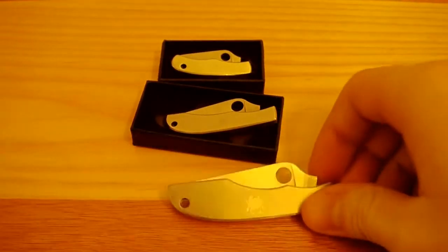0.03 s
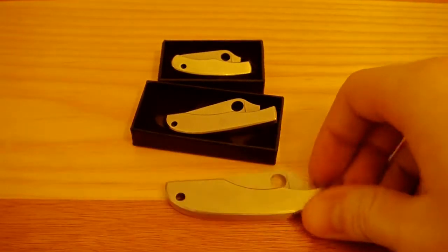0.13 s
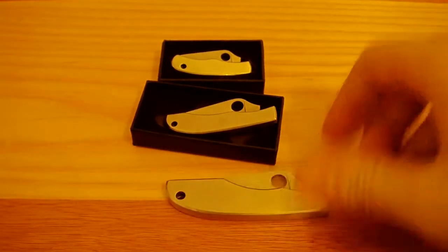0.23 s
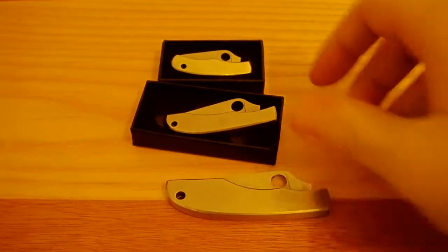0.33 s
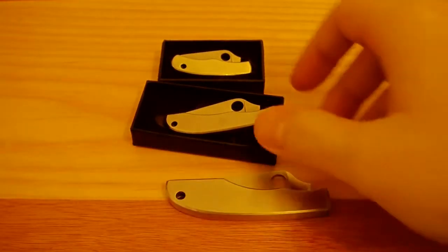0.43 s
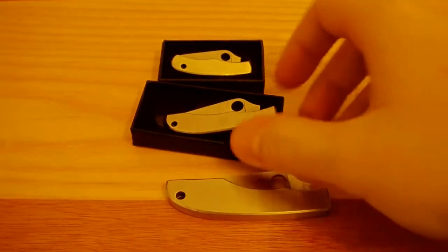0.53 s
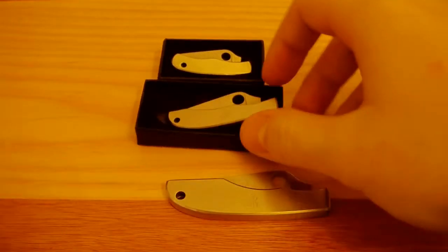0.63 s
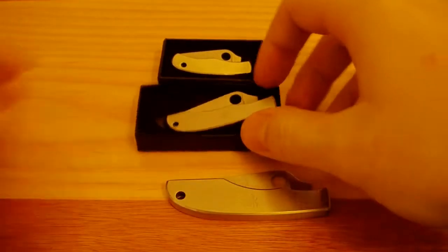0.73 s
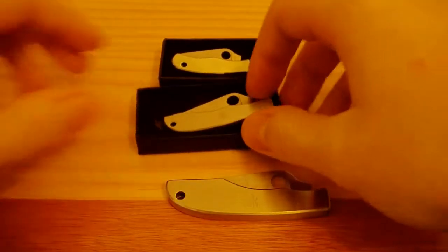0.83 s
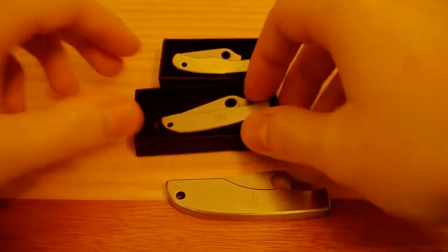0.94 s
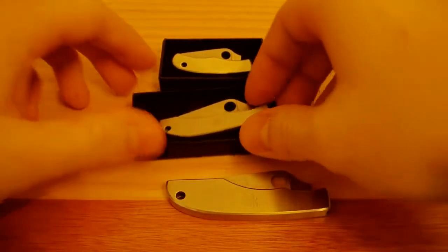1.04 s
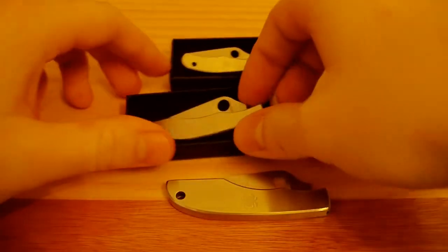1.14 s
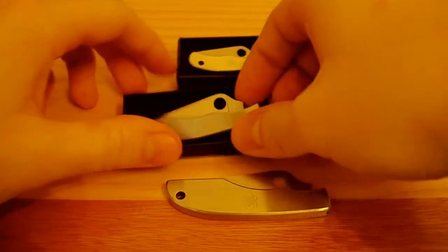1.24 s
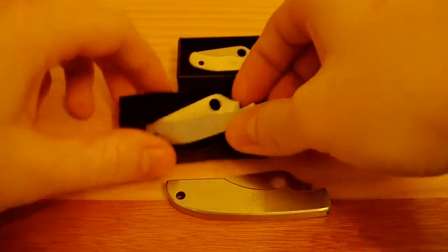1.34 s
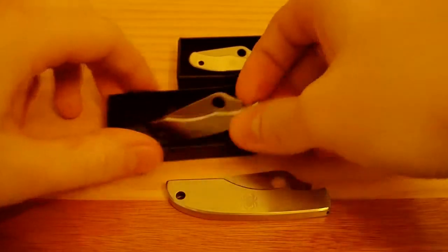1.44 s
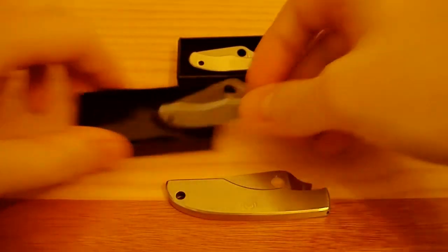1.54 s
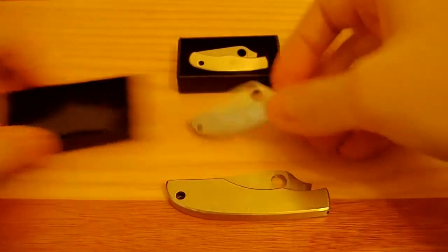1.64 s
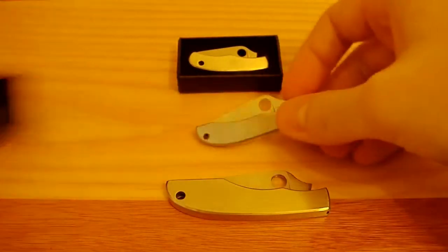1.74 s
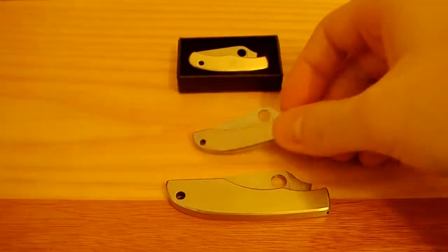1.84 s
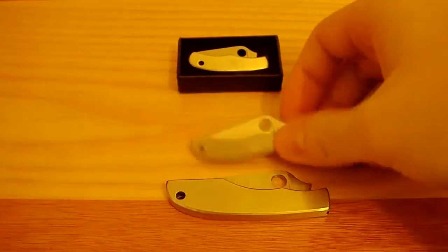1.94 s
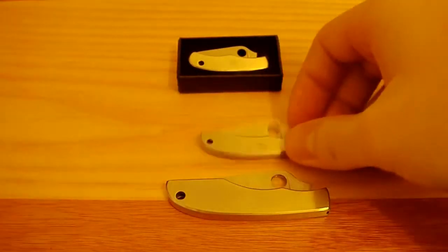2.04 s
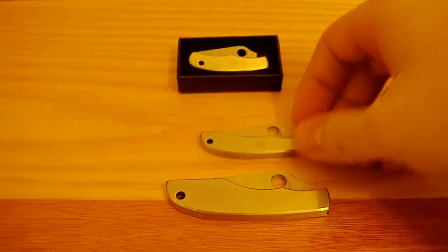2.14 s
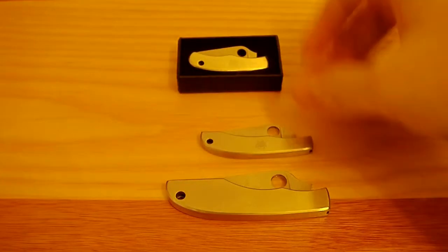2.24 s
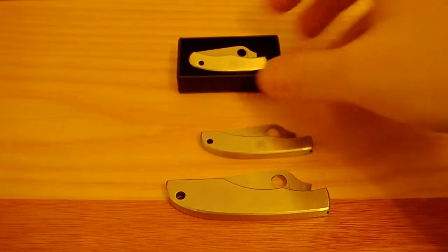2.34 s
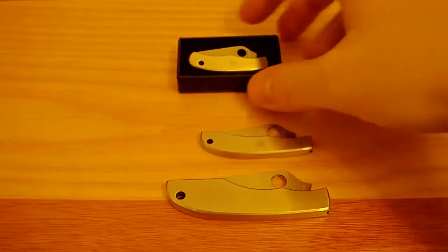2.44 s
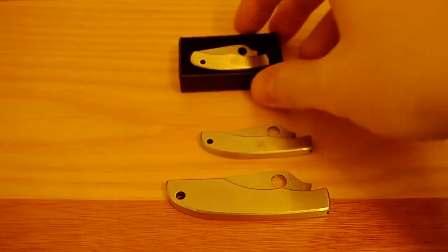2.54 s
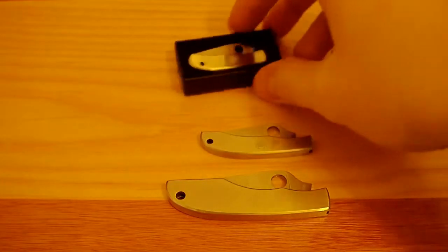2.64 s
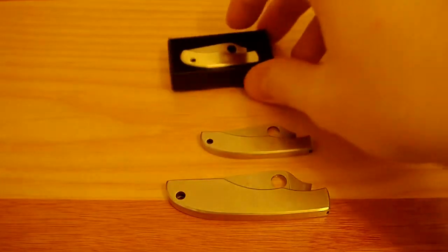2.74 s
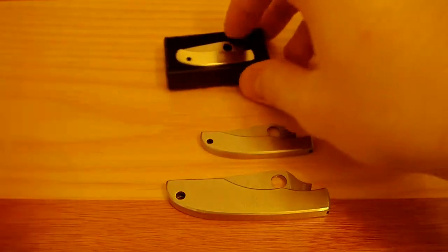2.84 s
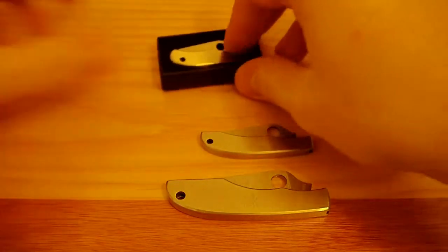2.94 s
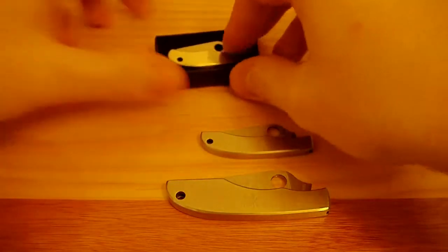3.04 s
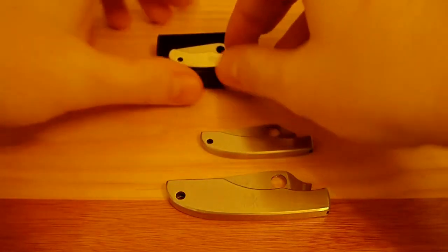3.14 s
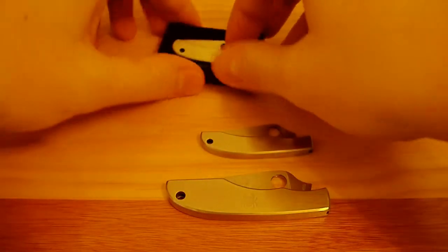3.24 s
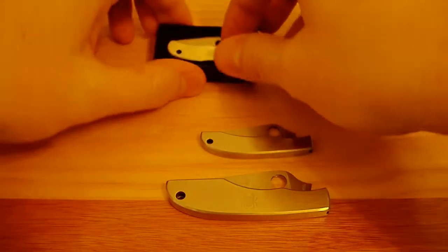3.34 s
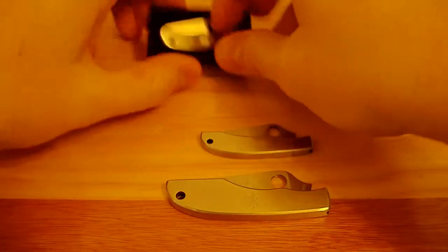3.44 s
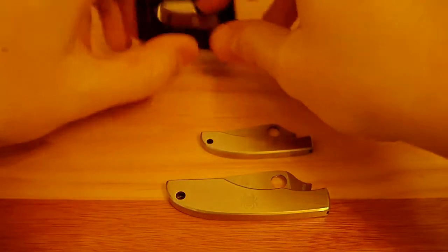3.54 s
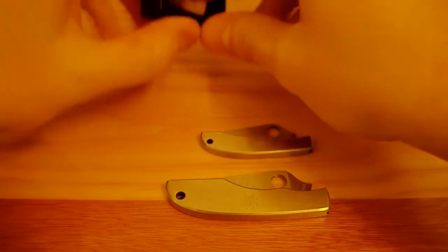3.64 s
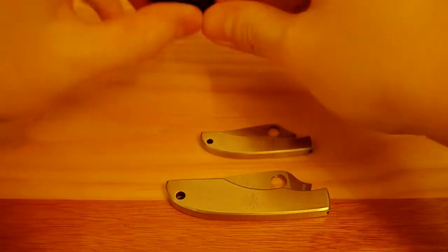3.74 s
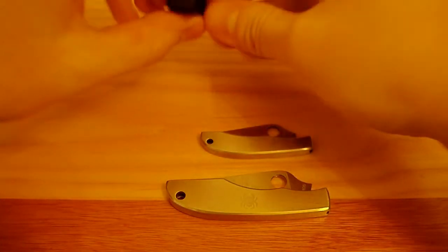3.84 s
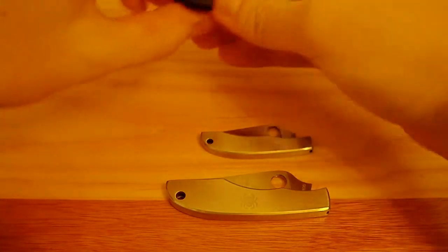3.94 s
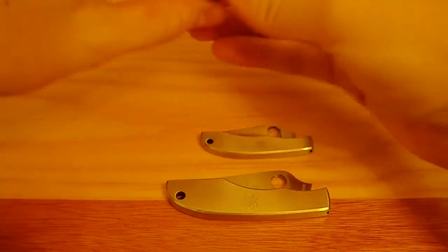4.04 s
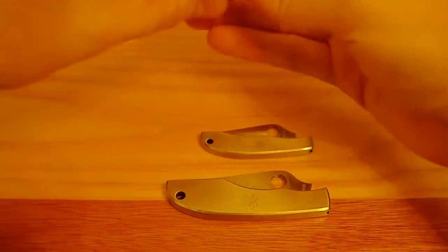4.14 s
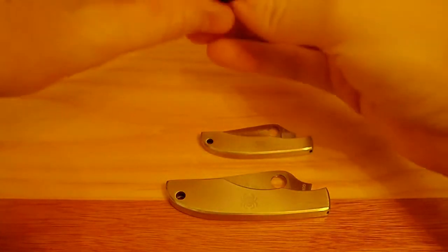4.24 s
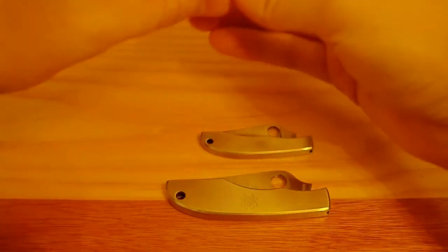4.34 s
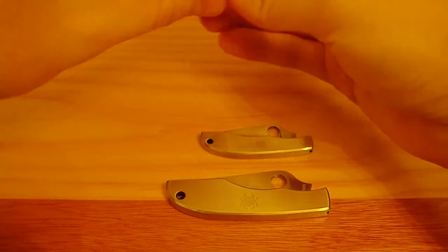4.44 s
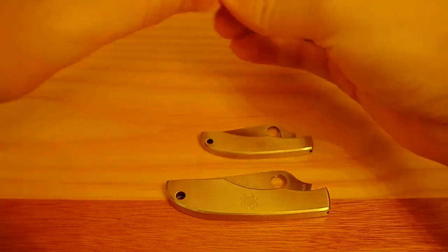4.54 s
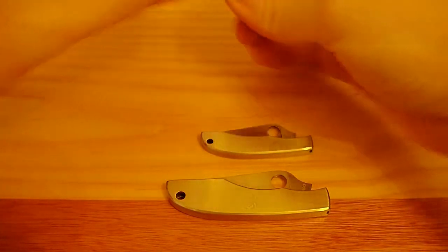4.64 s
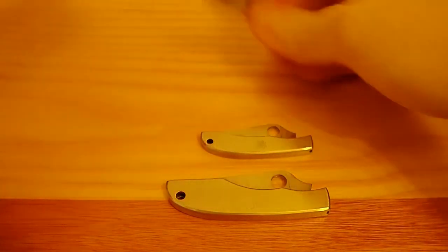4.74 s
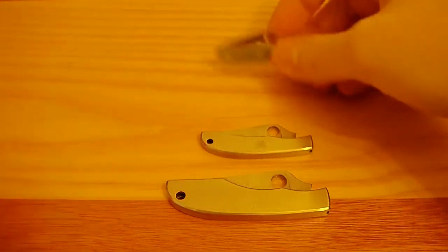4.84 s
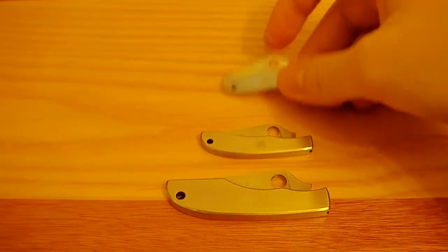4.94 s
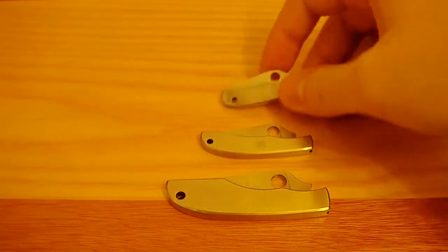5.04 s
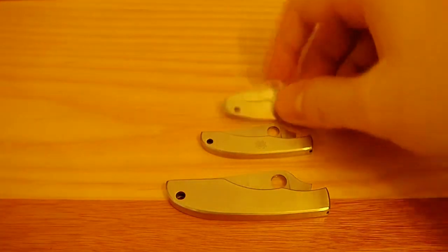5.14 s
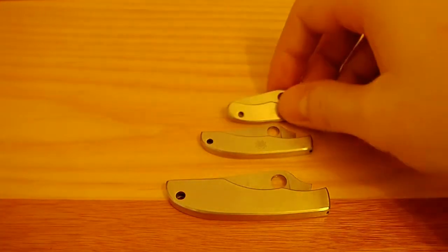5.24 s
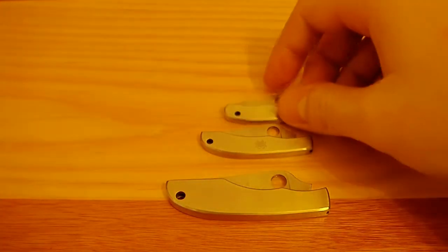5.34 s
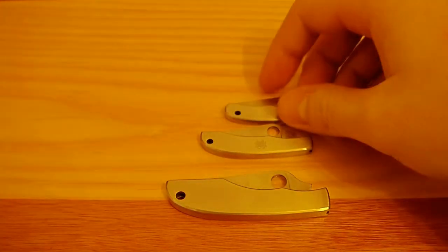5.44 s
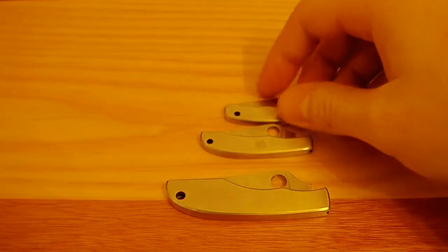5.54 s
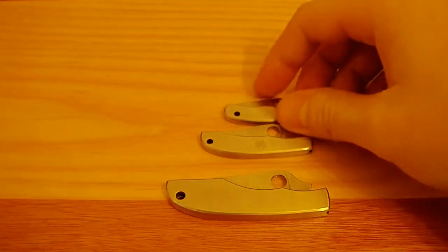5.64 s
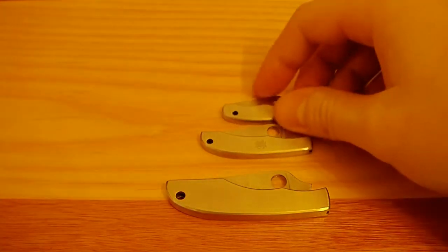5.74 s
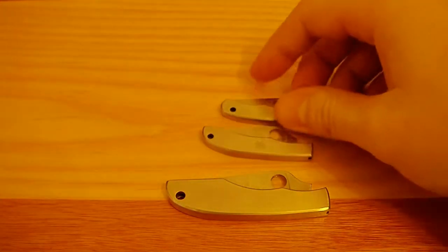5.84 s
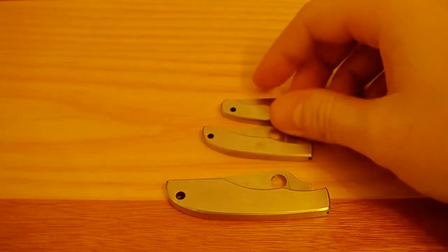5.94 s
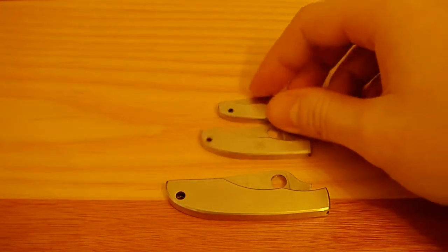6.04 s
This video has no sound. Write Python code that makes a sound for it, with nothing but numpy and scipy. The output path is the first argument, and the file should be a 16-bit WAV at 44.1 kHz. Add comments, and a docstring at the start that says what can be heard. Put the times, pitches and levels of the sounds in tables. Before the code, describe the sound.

Small steel folding knives click and clatter onto a wooden table, with stiff card boxes rattling and fingers rubbing between the knocks.

```python
"""A short dull slide, then a small steel folding knife knocks and rocks on a wooden table top, close up.
Two lighter knives follow, lifted from stiff little card boxes that rattle. Each blow is a click, a crack
and the fluttering ring of board or box; the loudest overload the input. Between blows, things slide on
the wood and fingers rub on card in tiny catches. Mains buzz, thin whines and hiss lie underneath."""
import sys
import numpy as np
from scipy import signal
from scipy.fft import rfft, irfft, next_fast_len
from scipy.io import wavfile

SR = 44100
rng = np.random.default_rng(int(sys.argv[2]) if len(sys.argv) > 2 else 0)


def waveform_to_disk(signal):
    """Save audio, clipped to [-1, 1], as 16-bit WAV at the path in sys.argv[1]."""
    frames = np.transpose(np.atleast_2d(signal))
    scaled = np.clip(frames, -1, 1) * 32767
    samples = np.round(scaled).astype(np.int16)
    wavfile.write(sys.argv[1], SR, samples)


N = 268115
PADDED = next_fast_len(N)

# modes of the board under the light knives: f/Hz, level/dB, t60/s
BOARD = [(652, -12, 0.24), (659.5, -0.5, 0.33), (1006, 6, 0.18), (1150, -15.5, 0.13), (1317, -11.5, 0.34),
         (1398, -21.5, 0.54), (1554, 2, 0.13), (1798, 3.5, 0.13), (2100, -7.5, 0.22), (2202, -4, 0.13),
         (2293, -4.5, 0.088), (2290, -9, 0.077), (2800, -16, 0.12), (2760, -18.5, 0.16),
         (3170, -15.5, 0.252), (3330, -21.5, 0.057), (3162, 1, 0.057), (3321, -1.5, 0.063),
         (3540, -11, .15), (4030, -7.5, 0.11), (4058, -7.5, 0.11), (4440, -4.5, 0.04), (5180, -27.5, 0.45),
         (6485, -9.5, .08)]
# tone of a blow, one row a band from low to high; weight lifts the bass, hardness the treble:
# knife colour/dB, box colour/dB, share of weight, share of hardness
CONTACT = [(-31, -27.5, 0.72, .05), (-3.5, -3.5, 0.84, 0.076), (3.5, 3.5, 0.68, 0.019),
           (1.5, 1.5, 0.031, 0.017), (-3, 1.5, 0.06, 1), (-17, -5, 0.041, 0.78)]


def amp(db):
    """dB to gain."""
    return 10 ** (np.asarray(db) / 20)


def rms_one(x):
    """Scale to rms 1."""
    return x / np.sqrt(np.mean(x ** 2) + 1e-20)


def at_hz(points, hz):
    """Read a curve on a log-frequency axis."""
    point_hz, values = np.transpose(points)
    return np.interp(np.log(hz), np.log(point_hz), values)


def band(x, low_hz, high_hz):
    """Butterworth band-pass."""
    return signal.sosfilt(signal.butter(3, [low_hz, high_hz], "band", fs=SR, output="sos"), x)


def coloured(x, spectrum):
    """EQ a steady noise; rms 1."""
    hz = np.maximum(np.fft.rfftfreq(PADDED, 1 / SR), 1)
    return rms_one(irfft(rfft(x, PADDED) * amp(at_hz(spectrum, hz)), PADDED)[..., :N])


def ring(drive, hz, t60):
    """One resonance: a unit click sets a sine of height 1 ringing."""
    r, w = amp(-60 / (t60 * SR)), 2 * np.pi * hz / SR
    return signal.lfilter([0, np.sin(w)], [1, -2 * r * np.cos(w), r * r], drive + 1e-18)


def hiss(level_db=-57):
    """Stereo noise floor, centred in the mids and wide in the treble."""
    # hiss colour: f/Hz, density/dB
    spectrum = [(18, -64), (30, -38.5), (127, -25), (414, -15), (664, -11), (1120, -6.5), (1380, -10),
                (1800, -6), (2110, -11.5), (2400, -12), (7050, -16.5), (8040, -16.5), (8690, -16.5),
                (14300, -18), (15900, -23.5)]
    # stereo image: f/Hz, left-right likeness
    likeness = [(60, 0.53), (180, 0.53), (550, 0.96), (1650, 1), (4970, 0.5), (15000, 0.036)]
    hz = np.maximum(np.fft.rfftfreq(PADDED, 1 / SR), 1)
    alike = at_hz(likeness, hz)
    mid, side = rfft(rng.standard_normal((2, PADDED)))
    pair = irfft(np.sqrt(1 + alike) * mid + np.sqrt(1 - alike) * side * [[1], [-1]], PADDED)
    return amp(level_db) * coloured(pair, spectrum)


def mains_buzz(mains_hz=59.94, pulse_s=.00141, notch_floor=0.098, scatter_db=2):
    """One short pulse a mains cycle; its width notches the harmonics."""
    # buzz colour ahead of the notches: f/Hz, relative level/dB
    spectrum = [(60, -24.5), (130, -23.5), (200, -13), (400, -5.5), (550, -6.5), (700, -3), (1050, -0.5),
                (1700, -2), (2500, -5.5)]
    t, harmonics = np.arange(N) / SR, np.arange(1, 43)
    hz = harmonics * mains_hz
    gains = amp(-71 + at_hz(spectrum, hz) + scatter_db * rng.standard_normal(len(hz)))
    gains *= notch_floor + np.abs(np.sin(np.pi * hz * pulse_s))
    phases = -0.015 * harmonics ** 2   # smears the pulse
    return sum(gain * np.cos(2 * np.pi * f * t + phase) for f, gain, phase in zip(hz, gains, phases))


def whines():
    """Thin, steady electrical tones."""
    # sines: f/Hz, rms level/dB
    tones = [(1828, -64.5), (4930, -79.5), (7882, -71)]
    t = np.arange(N) / SR
    return sum(np.sqrt(2) * amp(level_db) * np.sin(2 * np.pi * hz * t) for hz, level_db in tones)


def grains(per_s, spread_db):
    """Friction: random clicks of uneven size on a little noise; rms 1."""
    sizes = amp(spread_db * np.minimum(rng.exponential(1, N), 4)) * rng.choice([-1, 1], N)
    catches = rng.random(N) < per_s / SR
    return rms_one(sizes * catches + 0.26 * rng.standard_normal(N))


def strokes(rows, rise_db_per_s=1498, fall_db_per_s=506):
    """Body and treble envelopes: each stroke rises fast, slopes from start to end level and fades."""
    t, body, treble = np.arange(N) / SR, np.zeros(N), np.zeros(N)
    for start, length, start_db, end_db, treble_db in rows:
        near = slice(max(round((start - .05) * SR), 0), round((start + length + .15) * SR))
        since = t[near] - start
        level_db = np.interp(since, [0, length], [start_db, end_db])
        level_db -= rise_db_per_s * np.maximum(-since, 0) + fall_db_per_s * np.maximum(since - length, 0)
        body[near] += amp(level_db)
        treble[near] += amp(level_db + treble_db)
    return body, treble


def rubs():
    """Fine, bright grains of skin on card: a body, a treble hiss and a scrape resonance per stroke."""
    # finger strokes: t/s, length/s, start level/dB, end level/dB, treble share/dB, scrape f/Hz
    moves = [(0.913, 0.1, -58, -60, -27, 3450), (1.048, 0.019, -56, -51.5, -23, 3640),
             (1.109, 0.011, -54, -49, -23, 3950), (1.178, .12, -51.5, -57, -16, 3400),
             (1.418, 0.086, -62.5, -57, -9, 4100), (1.557, 0.074, -49, -53, -11, 3450),
             (1.66, 0.063, -46, -39, -11.5, 3430), (1.738, 0.053, -47, -50, -2, 2750),
             (2.095, 0.023, -48, -60, -29, 3300), (3.067, 0.0097, -49.5, -50.5, -4, 4500),
             (3.272, 0.017, -58, -58.5, -2.5, 4020), (3.33, 0.037, -65, -59, -2.5, 6040),
             (3.646, 0.11, -60, -63, -15, 2500), (3.843, 0.049, -48.5, -51.5, -9.5, 3890),
             (3.991, 0.033, -43.5, -48, -16.5, 3470), (4.053, 0.032, -52, -55, -10, 4330),
             (4.131, .07, -50, -52, -5.5, 4940), (4.204, 0.034, -50.5, -46.5, -13, 3120),
             (4.276, 0.012, -41, -49, -16, 3060), (4.327, 0.056, -51, -49.5, -12, 2380),
             (4.441, 0.028, -66, -54, -12, 3040), (4.518, 0.02, -53, -67, -13.5, 2600),
             (5.769, .06, -57.5, -67, -4.5, 3220), (6.018, 0.052, -59.5, -54.5, -6.5, 3700)]
    # body colour: f/Hz, density/dB
    spectrum = [(710, -51), (1200, -10), (1600, -23), (2100, -8.5), (2260, -13.5), (2760, -5), (5410, -1.5),
                (7000, -17), (9100, -24), (15400, -120)]
    friction = grains(per_s=3000, spread_db=3.6)
    body_env, treble_env = strokes([move[:-1] for move in moves])
    body = body_env * coloured(friction, spectrum)
    treble = treble_env * rms_one(band(friction, 5000, 11000))
    scrape = sum(strokes([move])[0] * rms_one(ring(friction, hz, t60=.003)) for *move, hz in moves)
    return amp(-1) * body + amp(-4.5) * band(scrape, 1200, 11000) + treble


def slides(top_hz=4200):
    """Dense small catches excite the hand-damped board; harder contact reaches the upper modes."""
    # dull slides on the board: t/s, length/s, start level/dB, end level/dB, upper modes share/dB
    moves = [(0.0, 0.11, -44, -57.5, -29), (0.13, .12, -59.5, -49, -11), (1.7, 0.02, -55, -35.5, 0),
             (1.75, 0.056, -57, -47, -26), (1.93, 0.062, -50, -41.5, -10.5),
             (2.09, 0.029, -41.5, -35.5, -14), (2.198, 0.012, -40.5, -25.5, -7),
             (3.1, 0.12, -44.5, -62, -27), (3.33, 0.077, -51.5, -61, -21), (5.15, 0.041, -45, -31.5, -14),
             (5.268, 0.043, -42.5, -20.5, -3.5), (5.77, 0.075, -50, -55.5, -15.5),
             (5.93, .03, -57.5, -59, -19.5)]
    friction = grains(per_s=1100, spread_db=6.9)
    wood = sum(amp(0.28 * db) * ring(friction, hz, 0.84 * t60) for hz, db, t60 in BOARD if hz < top_hz)
    sliding = rms_one(wood) + 1.2 * friction
    lower_env, upper_env = strokes(moves)
    lower = lower_env * rms_one(band(sliding, 772, 1790))
    upper = upper_env * rms_one(band(sliding, 2200, top_hz))
    return lower + upper


def low_cut(x, corner_hz=278):
    """The microphone passes little bass."""
    return signal.sosfilt(signal.butter(2, corner_hz, "high", fs=SR, output="sos"), x)


def blows(hits, colour_db, modes, click_db, crack_t60, tail_db, ring_db, chatter_decay, diffuse):
    """Each blow is a click, a short crack and a rough tail in six bands, plus the ringing modes."""
    # the bands of CONTACT: low f/Hz, high f/Hz
    bands = [(200, 400), (600, 1300), (1300, 2600), (2600, 5000), (5000, 7100), (8300, 13000)]
    # diffuse ring of board and room: f/Hz, t60/s
    tail_decay = [(300, 0.51), (900, 0.24), (1800, 0.21), (3600, 0.17), (6500, 0.093), (12000, 0.033)]
    attack_s, thump_s = 0.0002, 0.00069
    wobble_db, wobble_s = 3.8, .012   # the struck thing rocks, so its ring flutters
    favour_db, favour_octaves = 7.5, .15   # the place struck favours the modes near one pitch
    scatter_db, detune_share = 2.5, .008   # the grip shifts every mode a little from blow to blow
    out, size = np.zeros(N), round(.36 * SR)
    *_, to_weight, to_hardness = np.transpose(CONTACT)
    centres = np.sqrt(np.prod(bands, axis=1))
    tail_t60 = at_hz(tail_decay, centres)[:, None]
    mode_hz, mode_db, mode_t60 = np.transpose(modes)
    white, t = rng.standard_normal(4 * size), np.arange(size) / SR
    # chatter of the contact keeps feeding the modes, which makes the tail rough but coloured
    chatter = rms_one(sum(amp(db) * rms_one(ring(white, hz, chatter_decay * t60))
                          for hz, db, t60 in modes))
    cracks = np.array([rms_one(band(white, *edges)) for edges in bands])
    tails = np.array([rms_one(band(chatter + diffuse * white, *edges)) for edges in bands])
    clicks = np.array([band(signal.unit_impulse(size), *edges) for edges in bands])
    clicks = amp(click_db) * clicks / clicks.max(axis=1, keepdims=True)
    rocking = rms_one(signal.fftconvolve(white, np.hanning(round(wobble_s * SR)), "same"))
    wobble = amp(wobble_db * rocking)
    attack = 1 - np.exp(-t / attack_s)
    for at_s, level_db, weight_db, hard_db, thump_db, sustain, pitch_hz in hits:
        strength, phase, detune = rng.standard_normal((3, len(modes)))
        start, sustain = round(at_s * SR), np.clip(sustain, .3, 3)
        offset = start % (3 * size)   # each blow takes its own stretch of the noise
        part = slice(offset, offset + size)
        band_db = colour_db + weight_db * to_weight + hard_db * to_hardness
        crack = cracks[:, part] * amp(-5.5 - 60 * t / (crack_t60 * sustain))
        tail = tails[:, part] * amp(tail_db - 60 * t / (tail_t60 * sustain))
        impact = amp(band_db) @ (clicks + attack * (crack + tail))
        tone_db = at_hz(np.transpose([centres, band_db]), mode_hz)
        place_db = favour_db * np.exp(-(np.log2(mode_hz / pitch_hz) / favour_octaves) ** 2)
        gains = amp(ring_db + mode_db + tone_db + place_db + scatter_db * strength)
        poles = 2j * np.pi * mode_hz * (1 + detune_share * detune) - np.log(1000) / (mode_t60 * sustain)
        ringing = np.imag((gains * np.exp(1j * phase)) @ np.exp(np.outer(poles, t)))
        blow = amp(level_db) * (impact + attack * wobble[part] * ringing)
        # a brief, faint low thump under each blow
        thump = amp(thump_db) * t / thump_s * np.exp(1 - t / thump_s)
        out[start:start + size] += low_cut(blow) + thump
    return out


def boxes():
    """Stiff card boxes rattle and tick; their broad resonances die quickly."""
    # rattles: t/s, level/dB, weight/dB, hardness/dB, thump/dB, sustain factor, favoured f/Hz
    rattles = [(0.1291, -43, 2, 2.5, -89, 0.62, 6360), (0.4837, -14, 4.5, -16.5, -72, 1.55, 2080),
               (0.5044, -5, -7, -23, -58, 1.05, 3140), (0.5117, -13, -18.5, -25, -68, 1.1, 3100),
               (0.5252, -28.5, 14.5, 1, -64, 1.2, 2700), (0.5707, -36, 7, -17, -79, 4.1, 2420),
               (0.6493, -14.5, -3.5, -3, -50, 2.28, 3600), (0.6665, -23, 8, -10, -52, 1.05, 2180),
               (0.7373, -22.5, -5.5, -4, -79, 0.83, 2220), (0.9166, -49, -1, 1.5, -93, 3.3, 2920),
               (1.121, -44, -23, 0, -87, 0.91, 3560), (1.1909, -42, 3, -18, -93, 0.72, 3070),
               (1.6535, -37, 2.5, -3.5, -78, 1.9, 3600), (1.7165, -51.5, -2.5, -12, -76, 1.7, 3160),
               (2.5176, -58.5, 14, -1, -80, 1.2, 1850), (2.5706, -17.5, -3, -8, -69, 1.74, 3200),
               (2.5854, -13, -1.5, -15, -65, 1.04, 980), (2.5953, -9.5, -8.5, -3, -63, 1.75, 2100),
               (2.608, -26, 4.5, -10, -63, 1.3, 1860), (2.6394, -29, -7, -10, -71, 0.66, 1860),
               (2.6685, -32, 5.5, -6, -80, 0.49, 1870), (2.7003, -21.5, 2, -31, -79, 1.3, 1860),
               (2.7157, -26.5, -1, -18, -83, 1, 3100), (2.7533, -23.5, 2, -36, -82, 0.78, 2200),
               (2.809, -23, 4, -22, -84, 1.56, 1880), (2.866, -28.5, -6, -4.5, -91.5, 1.44, 2710),
               (3.8367, -40.5, -16, -5, -88, 0.9, 3630), (3.9854, -31.5, -27.5, -9, -90.5, 0.96, 3100),
               (4.2768, -26, -12.5, -1.5, -51, 0.68, 2700), (4.3376, -38, -20, -8, -92, 1.2, 2200),
               (4.4418, -49.5, -9, -4, -93, 1.05, 3160), (4.518, -49.5, -9, -1.5, -87, 1.2, 2200)]
    # box resonances: f/Hz, width/Hz, level/dB
    resonances = [(984, 17, -1), (1864, 120, 9), (2225, 280, 13), (2600, 56, -11.5), (3235, 128, 10.5),
                  (3570, 180, 10.5), (4640, 40, -22), (5300, 120, -39.5), (6147, 300, 6), (7020, 66, -36)]
    modes = [(hz, level_db, np.log(1000) / (np.pi * width)) for hz, width, level_db in resonances]
    colour_db = np.transpose(CONTACT)[1]
    return blows(rattles, colour_db, modes, click_db=-3.5, crack_t60=0.014,
                 tail_db=-18.0, ring_db=-14.5, chatter_decay=0.21, diffuse=1.8)


def knives(heavy_knocks=5):
    """Steel knocks on wood; the heavy knife, first down, loads the board differently from the rest."""
    # knocks: t/s, level/dB, weight/dB, hardness/dB, thump/dB, sustain factor, favoured f/Hz
    knocks = [(0.2444, -48, 5, 0, -74, 3.4, 970), (0.2897, -9.5, 4.5, 4.5, -76, 0.94, 1890),
              (0.2932, -20, 14.5, -27, -71, 0.57, 860), (0.3154, -20.5, -3, 6.5, -78, .7, 2300),
              (0.32, -19, 3, -33, -74, 1.47, 850), (1.8064, -3.5, -5, -12.5, -80, 0.75, 3150),
              (1.8106, -26.5, 2, -31, -30, 1.6, 1720), (1.8305, -19.5, -3, -31, -54.5, 1.87, 3180),
              (2.2164, -6, -13, -6, -71, 1.14, 3230), (2.2209, -15, -2, -31, -40, 0.81, 1550),
              (2.239, -24, -5.5, 1.5, -60.5, 1.83, 3200), (3.0806, -39.5, 8.5, -1.5, -89, 1.08, 1558),
              (5.0477, -8.5, -4, -6.5, -41.5, 1.14, 1550), (5.0626, -18, -5, -16.5, -57.5, 0.75, 3170),
              (5.0847, -30.5, -3, -26.5, -59.5, 3.2, 1000), (5.3093, -19, 0.5, -18, -58, 1.66, 1000),
              (5.3375, -23.5, 1, -28, -58, 0.82, 1550), (5.4945, -32, -7.5, 0, -65, 2.8, 1550),
              (5.4994, -13.5, -12.5, 3.5, -38.5, 1.32, 1810), (5.5027, -11, -11, -26, -60, 0.49, 2200)]
    # modes of the board under the heavy knife: f/Hz, level/dB, t60/s
    loaded_board = [(845, -1.5, 0.23), (991, -11, 0.34), (1065, -10.5, 0.21), (1790, -20.5, 0.35),
                    (2024, -10, 0.11), (1905, -15, 0.12), (2132, -25, 0.22), (2070, -26, 0.2),
                    (2475, -20.5, 0.12), (3672, -3.5, 0.098), (4230, -11, 0.103), (5570, -36, 0.17)]
    colour_db = np.transpose(CONTACT)[0]
    heavy = blows(knocks[:heavy_knocks], colour_db, loaded_board, click_db=-7.5, crack_t60=0.012,
                  tail_db=-17.5, ring_db=-7.5, chatter_decay=0.2, diffuse=2.0)
    light = blows(knocks[heavy_knocks:], colour_db, BOARD, click_db=-9.0, crack_t60=0.028,
                  tail_db=-14.5, ring_db=-12.0, chatter_decay=0.2, diffuse=1.0)
    return heavy + light


def scene():
    """All the handling sits in the centre, over the electrical floor."""
    handling = knives() + boxes() + slides() + rubs()
    return handling + mains_buzz() + whines() + hiss()


def record(dry, ceiling=.97, cutoff_hz=16400):
    """The loudest peaks clip; a steep low-pass takes off the top."""
    clipped = np.clip(dry, -ceiling, ceiling)
    return signal.sosfilt(signal.cheby2(16, 70, cutoff_hz, fs=SR, output="sos"), clipped)


dry = scene()
out = record(dry)
waveform_to_disk(out)
```